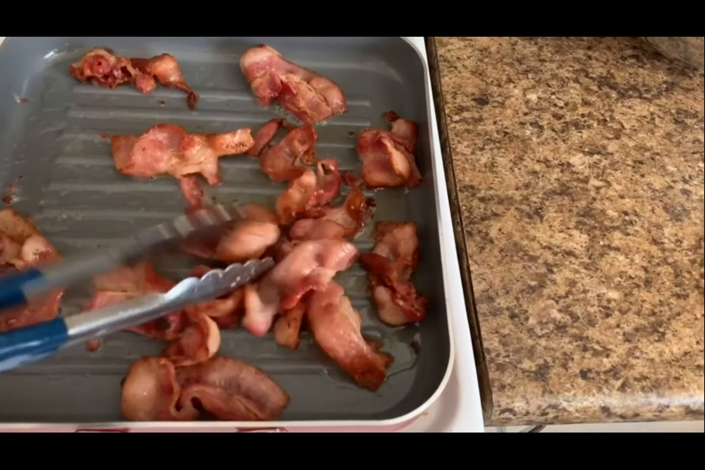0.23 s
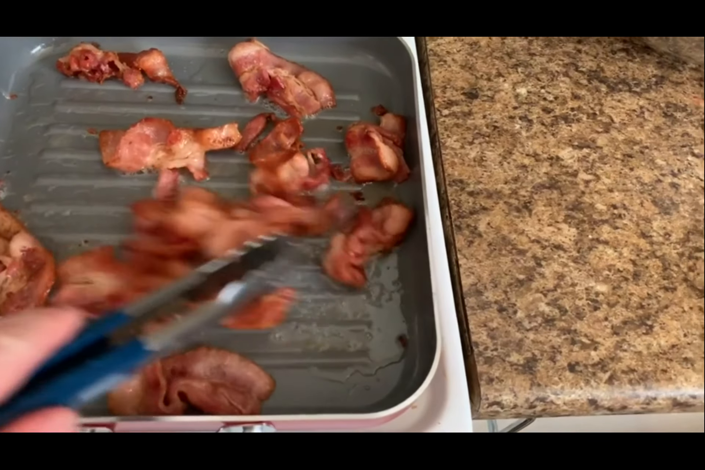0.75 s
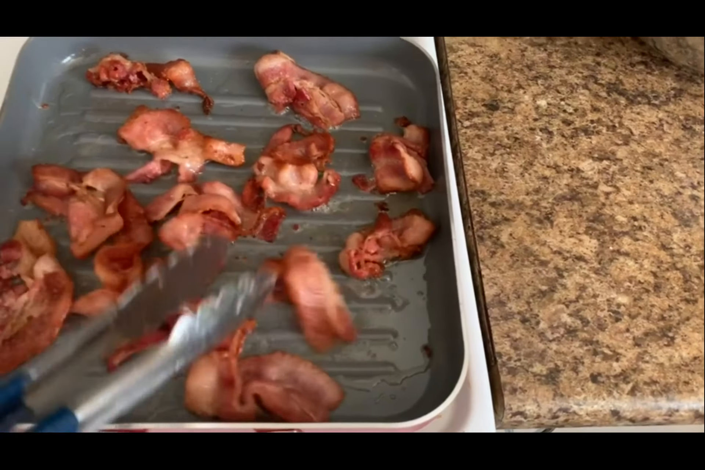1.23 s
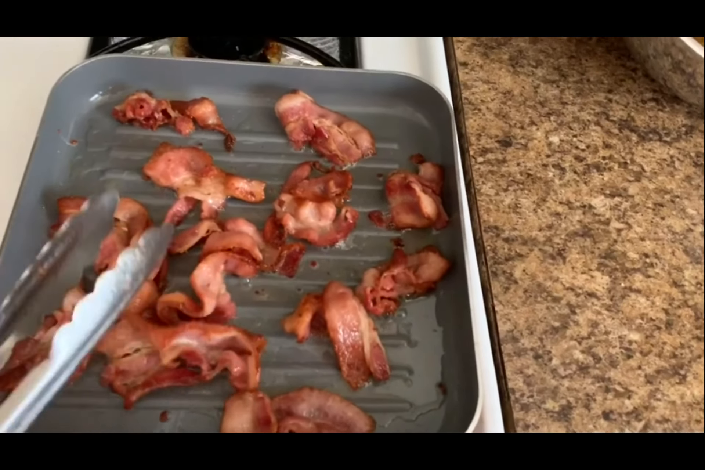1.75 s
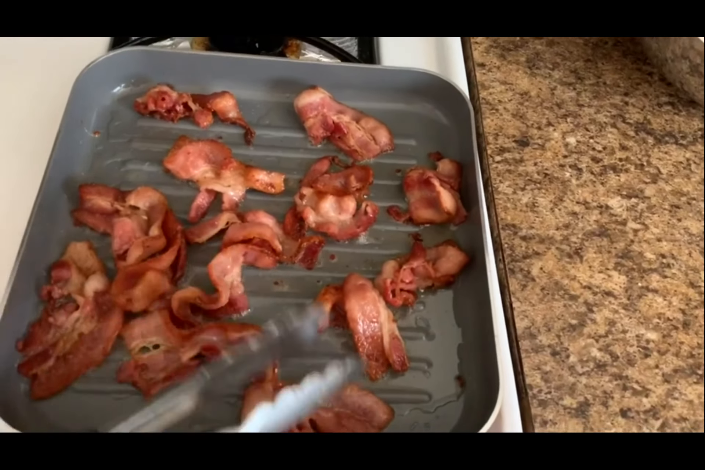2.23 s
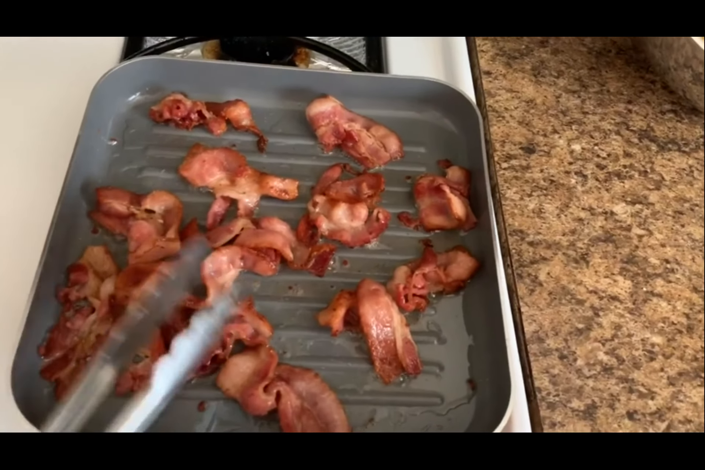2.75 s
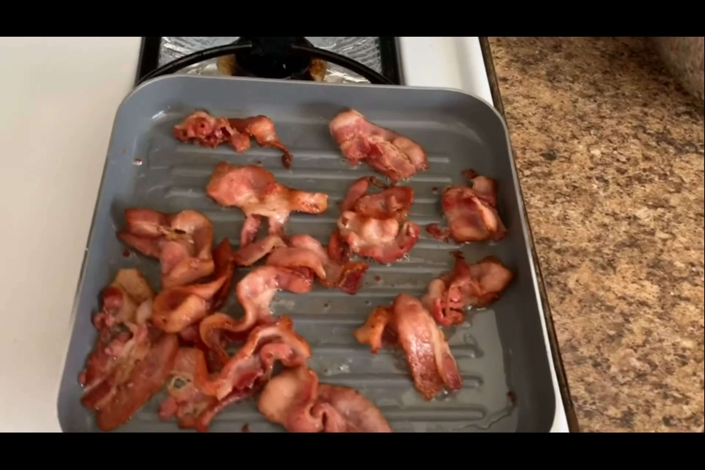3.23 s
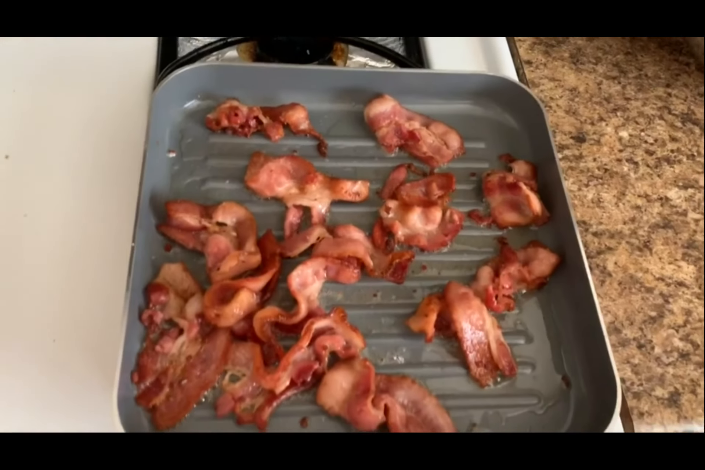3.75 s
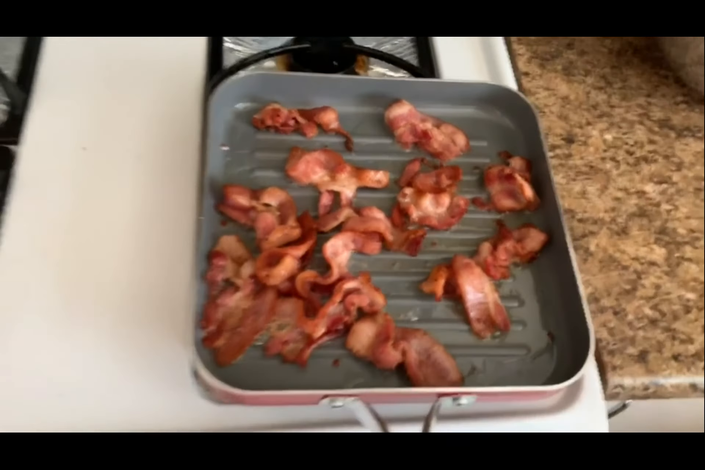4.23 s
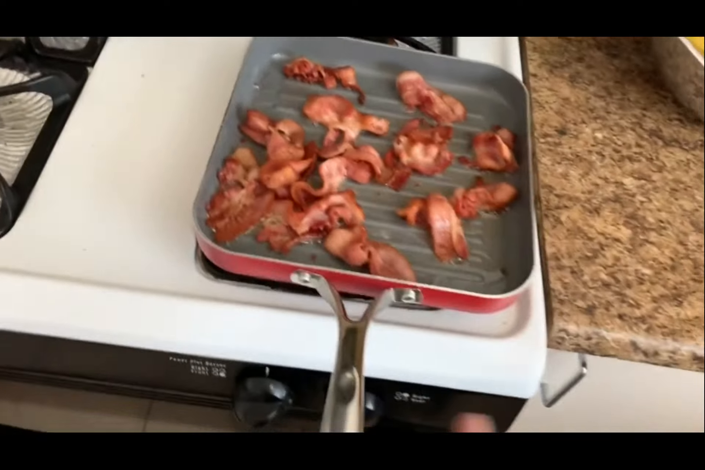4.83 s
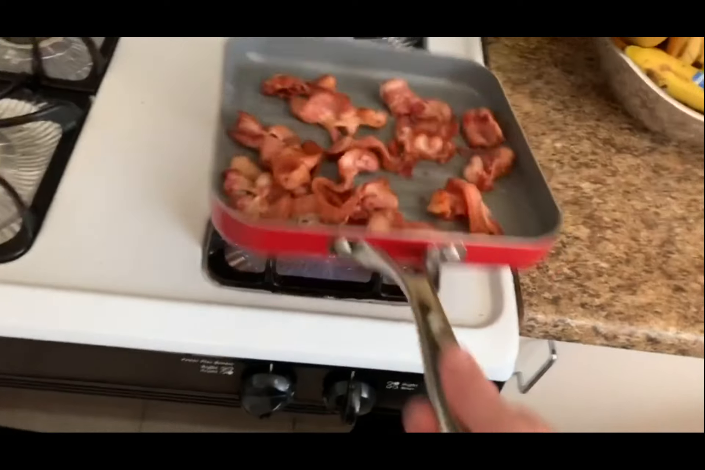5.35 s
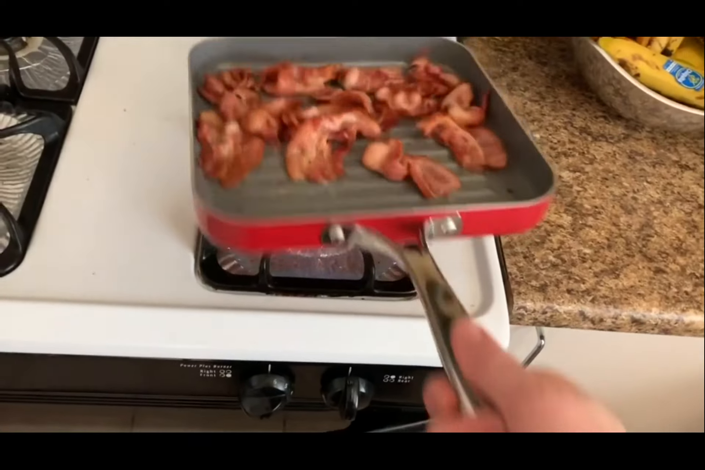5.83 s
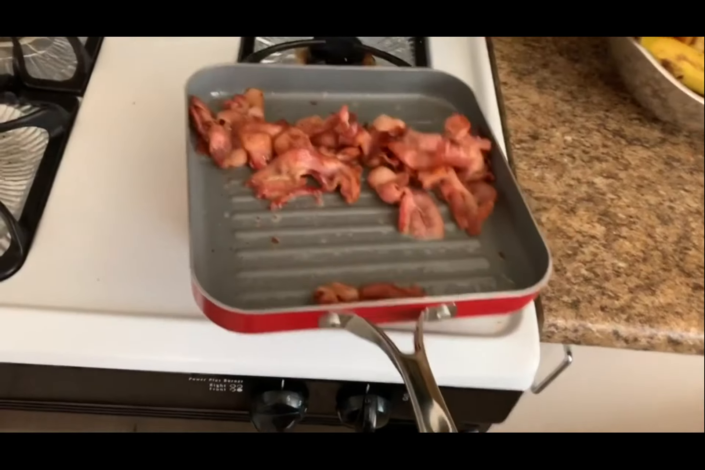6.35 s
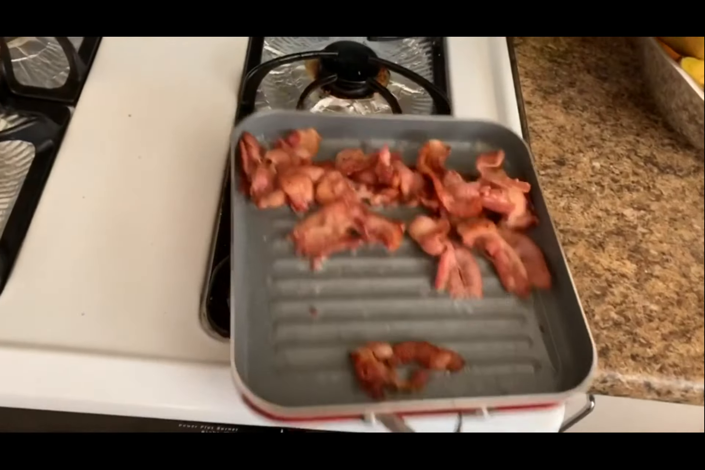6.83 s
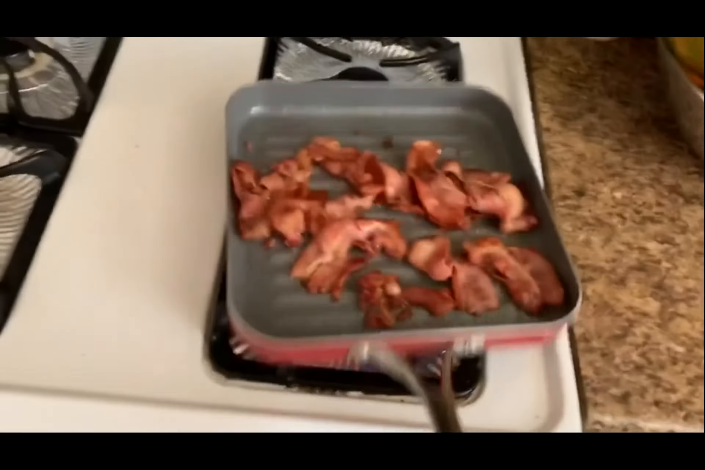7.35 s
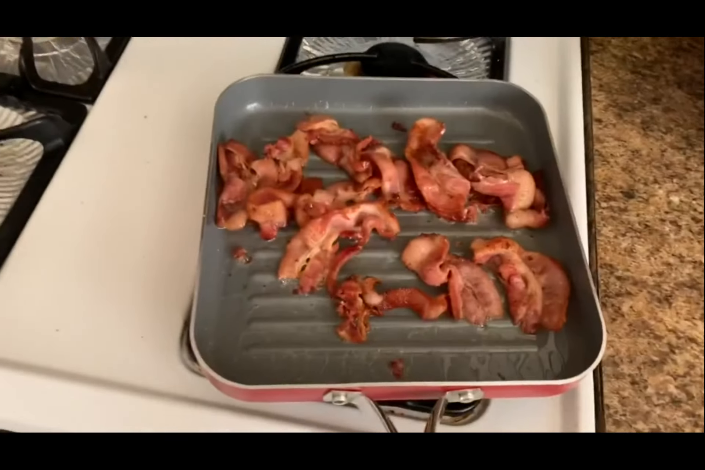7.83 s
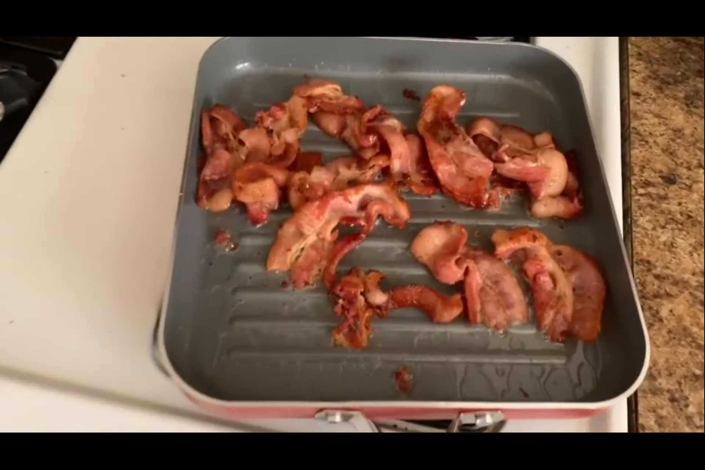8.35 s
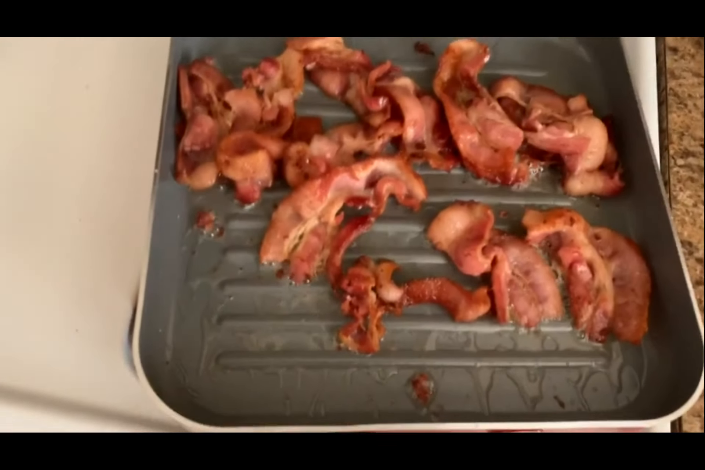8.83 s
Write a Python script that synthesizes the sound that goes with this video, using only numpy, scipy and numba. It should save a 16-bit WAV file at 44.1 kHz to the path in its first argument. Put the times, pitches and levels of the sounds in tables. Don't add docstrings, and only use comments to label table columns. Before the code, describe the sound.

Faint frying hiss and fat spits in a small kitchen, with sparse metallic tong knocks, dull knob clicks, soft bacon slaps and a loud rattling pan.

```python
import sys
import numpy as np
from scipy import signal
from scipy.fft import rfft, irfft, next_fast_len
from scipy.io import wavfile
from scipy.ndimage import uniform_filter1d
from numba import njit

SR = 44100
rng = np.random.default_rng(int(sys.argv[2]) if len(sys.argv) > 2 else 0)


def unload_audio(sound):
    columns = np.transpose(np.atleast_2d(sound))
    steps = np.round(np.clip(columns, -1, 1) * 32767)
    wavfile.write(sys.argv[1], SR, steps.astype(np.int16))


def invert_db(x):
    u = np.asarray(x, float) / 20
    return 10 ** u


N = 401310

# [t/s, peak level/dB, favoured f/Hz at the struck spot, thud level/dB, clank level/dB]
TONG_KNOCKS = [(0.002, -21.5, 1110, -5.5, -11.5), (0.76, -19, 1050, -27, -3), (0.775, -12, 1130, -35, -8.5),
               (0.830, -19.5, 1194, -39, -8), (1.935, -4.5, 766, 1, -11), (2.081, -4.5, 775, -6, -7.5),
               (2.124, -9.5, 836, -31, -13), (2.36, -6.5, 2040, -27, -9), (2.384, -17.5, 760, -2, 0),
               (2.45, -11.5, 673, -35, -8), (2.91, -8.5, 770, -12, -12), (2.941, -16.5, 744, -20, -10),
               (3.022, -15.5, 774, -2.5, -18), (3.546, -21, 2000, 7, -1.5), (3.609, -21, 2550, -21, -4.5),
               (3.635, -23, 1870, -9, -2.5), (3.684, -26.5, 670, 2, -17), (3.794, -29.5, 696, -26, -28)]
# [t/s, peak level/dB, favoured f/Hz at the struck spot, thud level/dB, clank level/dB]
GRATE_BUMPS = [(4.956, -21, 583, 0, -12), (4.983, -20.5, 1320, -16, -40), (5.051, -9, 795, -14, -3),
               (5.073, -22, 1120, -9, -3), (5.096, -33, 1330, -6, -3), (5.24, -17, 1350, 3, -14),
               (6.721, -7, 720, -0.5, -6), (6.767, -13, 950, -0.5, -9.5), (6.8805, -8, 640, -4, -3),
               (6.897, -11, 795, -31, -12), (6.992, -10.5, 1310, -25, -4.5), (7.0017, -10.5, 610, 0, -15),
               (7.026, -20, 1080, 2, -4.5), (7.052, -16, 1800, 0.5, -13), (7.092, -17, 820, -33, -9),
               (7.123, -11.5, 434, 0, -5.5), (7.1423, -4.5, 614, -10, -8), (7.172, -17.5, 640, -12, -8),
               (7.21, -17, 740, -10, -22), (7.268, -18.5, 710, -14, -2.5), (7.284, -21.5, 810, -7, 1),
               (7.298, -7.5, 780, -15.5, -9), (7.318, -8, 900, -7.5, -12.5), (7.332, -17.5, 990, 0, -20),
               (7.347, -25, 800, -3, -19), (7.442, -12, 870, -6.5, -17), (7.461, -8.5, 580, -23, -4),
               (7.486, -13, 615, 1, -10), (7.536, -10.5, 620, -24, -3), (7.556, -12.5, 1270, -6, -10),
               (7.658, -12, 890, -3.5, -16)]
# [t/s, pressure level/dB, hold/s, thud level/dB, clank level/dB]
TONG_SCRAPES = [(0.753, -29.5, 0.053, -8.5, -7.5), (0.84, -51, 0.0088, 5, 10.5),
                (1.925, -40, 0.0044, -2.5, -3), (1.938, -24, 0.011, -3.5, -3.5),
                (2.082, -18, 0.054, -2.5, -5), (2.2, -52.5, 0.094, 10.5, -4), (2.36, -29, 0.029, 4.5, 0.5),
                (2.45, -36, 0.0024, -7, 6), (2.897, -33, 0.0074, -0.5, -4), (2.912, -21.5, 0.051, 0.5, -3),
                (2.98, -44.5, 0.083, 3, -3), (3.552, -34, 0.11, 4, -4.5), (3.1, -62, 0.28, 12, -19),
                (3.72, -46.5, 0.084, 8.5, -18)]
# [t/s, pressure level/dB, hold/s, thud level/dB, clank level/dB]
GRATE_SLIDES = [(4.943, -42.5, 0.057, 9, -26), (5.055, -20.5, 0.054, -3, -7), (5.241, -28, 0.0052, 4, -9),
                (5.378, -59.5, 0.22, 9.5, -9), (6.722, -28, 0.026, -5, -4.5),
                (6.875, -26.5, 0.049, 3.5, -3), (6.995, -18, 0.068, -1, -7), (7.094, -19, 0.125, -7.5, -11),
                (7.272, -19, 0.079, -0.5, -7.5), (7.444, -21.5, 0.053, 0.5, -4.5),
                (7.539, -18.5, 0.021, -5.5, -8), (7.67, -27.5, 0.015, -1, -6),
                (7.792, -57.5, 0.14, 11, -14)]
# [f/Hz, level/dB, T60/s]
RESTING_MODES = [(94, -6, .25), (131, -5, .22), (214, -5, .2), (275, -9, .2), (321, -4, .2), (397, -5, .2),
                 (446, -7, .2), (560, -8, .13), (620, -3, .15), (690, -15, .12), (773, -3, .11),
                 (910, -8, .13), (1037, -6, .14), (1135, -4, .13), (1324, -3, .14), (1470, -9, .12),
                 (1729, -8, .12), (2025, -4, .11), (2165, -5, .11), (2286, -3, .13), (2550, -4, .13),
                 (2870, -6, .1), (3270, -7, .1), (3590, -8, .1), (4090, -9, .1), (4900, -11, .08),
                 (5500, -12, .08), (6850, -13, .06), (7200, -14, .06)]
# [f/Hz, level/dB per Hz]
CLATTER_SPECTRUM = [(24, -16.5), (40, -8), (81, -1.5), (279, -4.5), (358, -8), (401, -7), (491, -18),
                    (612, 0.5), (690, -4.5), (773, 1.5), (924, -6.5), (2080, -11.5), (7390, -23),
                    (8850, -35), (11500, -64.5), (19500, -120)]
# [t/s, level/dB, f/Hz, hold/s]
DRAG_SONGS = [(0.763, -23, 3610, 0.024), (0.766, -27, 2524, 0.023), (0.768, -20.5, 1113, 0.024),
              (0.764, -23, 808, 0.033), (0.77, -31, 1475, 0.058), (2.025, -37, 1035, 0.035),
              (2.202, -33, 1039, 0.024), (0.829, -16, 1140, 0.0069), (0.83, -24, 810, 0.012),
              (0.84, -26.5, 2150, 0.018), (1.939, -12.5, 785.5, 0.048), (1.944, -21.5, 2552, 0.019),
              (1.959, -27, 2089, 0.035), (1.937, -26.5, 3240, 0.027), (2.087, -14.5, 775, 0.067),
              (2.084, -19.5, 2037, 0.062), (2.086, -28, 2589, 0.029), (2.112, -18.5, 283, 0.027),
              (3.02, -19, 676, 0.0099), (3.675, -23.5, 176, 0.026), (5.056, -17, 786, 0.026),
              (5.075, -17.5, 421.5, 0.041), (5.083, -17.5, 1336, 0.032), (5.242, -34, 1320, 0.035),
              (5.255, -36, 935, 0.049), (5.246, -39, 1900, 0.031), (6.899, -19, 776, 0.032),
              (6.997, -20.5, 608, 0.016), (7.024, -22, 3050, .02), (7.038, -21, 270, 0.024),
              (7.054, -24, 1850, 0.017), (7.155, -26, 616, 0.026), (7.21, -25.5, 1317, 0.047),
              (7.32, -20.5, 2244, 0.024), (7.317, -22, 1000, 0.032), (7.464, -17.5, 616.4, 0.03),
              (7.553, -23, 1270, 0.011), (7.559, -17, 642, 0.03), (7.676, -27, 2760, 0.014),
              (3.541, -27, 2200, .012), (3.549, -27, 640, 0.016), (3.607, -30.5, 1550, 0.036),
              (3.606, -35, 1330, .015), (3.628, -32.5, 1000, .03), (7.407, -37, 3600, 0.038),
              (7.45, -21, 2750, .015), (7.476, -24, 2900, 0.012), (2.453, -21, 680, 0.014),
              (6.73, -21, 780, 0.024), (3.64, -25.5, 1994, 0.019), (3.64, -28, 2500, 0.019),
              (3.795, -43, 2190, 0.0067), (3.025, -16.5, 740, .012)]
# [t/s, level/dB, f/Hz, hold/s]
DIRECT_SONGS = [(0.751, -30, 945, .008), (7.094, -13.5, 795, .012), (7.04, -17.5, 190, 0.025),
                (7.123, -21.5, 1300, .015), (7.211, -19, 700, 0.023), (7.27, -20.5, 663, .02),
                (7.312, -17, 791, .03), (7.28, -26.5, 2166, 0.076), (7.444, -15, 866, .01),
                (7.6, -26, 700, 0.038), (7.684, -16, 777, .008)]
# [t/s, peak level/dB, f/Hz]
BOTTOM_THUNKS = [
    (2.081, -14, 784),
    (2.383, -4.5, 787),
    (2.910, -0.5, 757),
    (2.942, -7.5, 772),
    (3.023, -5, 793),
    (5.244, -37, 1290),
    (7.66, -12.5, 766),
    (7.68, -7.5, 757),
    (1.949, -13, 750),
]
# [t/s, peak level/dB, f/Hz]
EDGE_CRACKS = [(2.361, -13, 2180), (5.15, -25, 4000), (5.24, -26, 2500), (5.053, -15, 3500),
               (6.721, -13.5, 3000), (6.724, -22, 1486), (6.881, -11, 2480), (6.992, -15, 2500),
               (7.0, -6, 1700), (7.032, -19, 3000), (7.096, -18, 1300), (7.146, -15, 2500),
               (7.175, -18.5, 1990), (7.215, -27, 900), (7.269, -16, 2500), (7.299, -14.5, 4000),
               (7.4436, -12, 3000), (7.461, -16, 3000), (7.5, -27, 1200), (7.537, -9, 2530),
               (7.561, -25, 1300), (7.675, -23, 2800)]
# [t/s, peak level/dB, f/Hz]
BROAD_SNAPS = [(0.831, -23, 3400), (7.36, -22, 400), (7.49, -12, 400), (7.053, -11, 200),
               (2.365, -14, 2100), (7.2695, -18, 1200), (7.094, -15, 2000), (7.0215, -15, 1500),
               (7.068, -18, 1200), (7.123, -19, 2000), (7.287, -19, 3500), (7.326, -18, 1500),
               (7.487, -15, 1500), (7.498, -16, 900), (7.658, -25, 2600), (8.042, -40, 2500),
               (8.913, -36, 2600), (8.925, -41, 4500)]
# [t/s, peak level/dB, f/Hz]
TONG_CLINKS = [(0.775, -16.5, 2570), (0.83, -36, 2180), (2.0803, -10.5, 1960), (2.362, -13, 2110),
               (2.9098, -13.5, 2090), (3.5496, -14, 1954), (3.6087, -23, 2470), (3.6367, -16, 1960),
               (3.7938, -31, 2180), (4.9564, -30, 2140), (5.0539, -14, 2020), (7.0005, -16, 2260),
               (7.5373, -15, 2160)]
# [t/s, peak level/dB, f/Hz]
RIM_TINKS = [(0.7731, -3, 3590), (0.8315, -19, 3240), (2.3625, -10, 3200), (2.4493, -15, 3700),
             (3.0245, -17.5, 3254), (3.5468, -15, 4960), (3.6374, -24, 3610), (4.9571, -29, 4150),
             (5.0524, -30, 3500), (6.7211, -22, 3630), (7.0928, -33, 3380), (7.2988, -21, 4720),
             (7.4435, -21, 7520)]
# [t/s, peak level/dB, favoured f/Hz, slide length/s]
BACON_TOSSES = [
    (5.23, -38, 1320, 0.0051),
    (5.29, -43, 935, 0.012),
    (5.408, -39.5, 1300, 0.016),
    (5.768, -36, 1030, 0.034),
    (5.991, -40, 1720, 0.03),
    (6.17, -34, 1340, 0.035),
    (6.253, -23.5, 1265, 0.007),
]
# [f/Hz, level/dB, T60/s]
LIFTED_MODES = [(935, -3, 0.2), (1050, 5, 0.59), (1265, 3, 0.2), (1720, -6, 0.29), (1870, 0, 0.12),
                (2290, 2, 0.21), (2500, 3, 0.048), (3150, -2, .07)]
# [t/s, peak level/dB, f/Hz, T60/s]
FREE_RINGS = [(5.243, -34, 935, .3), (5.243, -28, 1326, .25), (5.776, -45, 1034, 0.46),
              (5.776, -50, 1330, .25), (5.772, -45, 2060, .14), (5.776, -54, 2530, .35),
              (5.99, -48, 921, .25), (5.99, -51, 1330, .2), (6.006, -52, 1707, .7), (6.182, -39, 1320, .2),
              (6.255, -39, 3150, .12)]
# [t/s, peak level/dB, f/Hz, T60/s]
KNOB_TICKS = [
    (4.252, -11.5, 890, 0.011),
    (4.379, -19.5, 615, 0.042),
    (4.482, -16, 301, 0.02),
    (4.53, -12.5, 545, 0.026),
    (4.541, -22, 770, 0.013),
    (4.546, 4.5, 490, 0.02),
    (4.553, -5, 764, 0.028),
    (4.576, -17, 770, 0.022),
]
# [t/s, peak level/dB, f/Hz]
FAT_SPITS = [(0.3284, -45, 2540), (1.256, -39, 5300), (1.405, -35.5, 6900), (1.483, -36, 3300),
             (1.548, -32, 3930), (1.7527, -19.5, 3720), (2.05, -31, 6760), (2.333, -29.5, 6900),
             (2.595, -42, 7000), (2.6509, -40, 3900), (2.7555, -36.5, 3370), (2.79, -25.5, 6800),
             (3.247, -33, 4500), (3.384, -31.5, 6560), (3.386, -35, 2280), (3.413, -27.5, 4180),
             (3.865, -43, 4120), (4.0233, -34, 5100), (4.379, -30, 2500), (4.5528, -31.5, 2410),
             (4.8755, -41.5, 6900), (5.5464, -30, 6800), (5.674, -34, 4630), (5.745, -34, 5370),
             (6.178, -49, 2570), (6.225, -27, 4600), (8.0426, -36, 6850), (8.7905, -30, 7450),
             (8.897, -34, 5420), (8.9153, -37, 7170)]
# [t/s, peak level/dB, f/Hz, T60/s]
FAT_FLARES = [
    (0.1521, -29, 3670, 0.068),
    (1.722, -39.5, 6800, 0.53),
    (1.7814, -28, 3730, 0.08),
    (4.2574, -24, 4400, 0.06),
    (5.4552, -42, 4500, 0.37),
    (5.6297, -41, 5200, 0.12),
    (6.1799, -37.5, 5530, 0.47),
    (6.2584, -25.5, 3150, 0.069),
    (8.8972, -43, 7540, 0.14),
]
# [t/s, level/dB]
SIZZLE_LEVEL = [(0.0, -53.5), (0.33, -55.5), (1.22, -55), (1.8, -54), (2.5, -55), (3.42, -54), (4.9, -56.5),
                (5.25, -55.5), (6.18, -55.5), (7.75, -56), (8.08, -55.5), (9.1, -52.5)]
# [f/Hz, level/dB per Hz]
SIZZLE_SPECTRUM = [(710, -28.5), (1200, -18.5), (1540, -14.5), (2440, -6.5), (2960, -4), (4890, -2),
                   (6130, -7), (7300, 3.5), (7940, -10), (8850, -9), (11500, -47.5), (19500, -120)]
# [f/Hz, level/dB per Hz]
AIR_SPECTRUM = [(15, -23), (32, -3.5), (58, 0.5), (125, -0.5), (160, -5.5), (190, -12.5), (250, -9),
                (330, -11.5), (480, -15), (900, -27), (1300, -24), (3000, -39), (5000, -49.5)]
# [f/Hz, width/Hz, level/dB]
FAN_TONE = (207, 10.2, -47.5)
# [t/s, level/dB]
FLAME_LEVEL = [
    (0, -57.5),
    (3.1, -55.5),
    (3.3, -61),
    (3.5, -57),
    (5.2, -60),
    (5.4, -73),
    (6.3, -60.5),
    (6.6, -62),
    (9.1, -54),
]
# [t/s, rumble level/dB, hold/s]
FINGER_SHIFTS = [
    (4.2, -51, .03),
    (4.4, -42.5, 0.034),
    (4.56, -42.5, 0.13),
    (5.336, -46, 0.054),
    (5.443, -40, 0.023),
    (7.794, -46, 0.054),
    (7.852, -45, 0.023),
]

THUD_FOOT_HZ, THUD_TOP_HZ, CLANK_FOOT_HZ = 74, 413, 1644
CHATTER_S = 0.012
CLINK_T60_S, TINK_T60_S, THUNK_T60_S = 0.1, 0.063, 0.085
SPIT_T60_S, CRACK_T60_S = 0.025, 0.014
PRESS_DB_S, EASE_DB_S = 2601.5, 291.5
LINGER, LINGER_TOP_DB, DULLING, SKIM = 0.42, 23, 0.084, 0.46
SONG_RISE_S, SONG_CHOKE_DB_S, SONG_ROUGH = 0.0018, 899.5, 0.4
SLOSH_DB = -27.5
FLAME_HZ, AIR_DB = 755, -47.5
GRIP_RISE_DB_S, GRIP_FALL_DB_S = 505, 145
ROOM_T60_S, ROOM_DB, ROOM_DULL_HZ = 0.35, -9, 3000
NOTES_WET_DB = -11
CEILING, TOP_HZ, CLIP = 0.74, 8313, 0.7


def pan():
    s, db, spot_hz, thud_db, clank_db = np.transpose(TONG_KNOCKS + GRATE_BUMPS)
    chatter = grit(7000, 2.0)
    slip = grit(5000, 1.5) * invert_db(3 * walk(60))
    bounce_s = np.full(len(s), CHATTER_S)
    force = np.array([strikes(s, db + part_db - 9.0, bounce_s, chatter) for part_db in (thud_db, 0, clank_db)])
    force[0] = sieve(force[0], 170, "high")
    force += invert_db(-3.5) * slip * drags(TONG_SCRAPES + GRATE_SLIDES)
    force[0] = np.roll(force[0], int(0.007903 * SR))

    group = np.searchsorted([THUD_TOP_HZ, CLANK_FOOT_HZ], np.array(RESTING_MODES)[:, 0])
    part_gain = invert_db(np.array([[3.0], [-3.0], [1.5]]))
    modes = body(force * part_gain, RESTING_MODES, group, s, spot_hz, 9.3, 0.62, damping=2.18, detune=0.0064)

    thud = sieve(force[0], [THUD_FOOT_HZ, THUD_TOP_HZ], "band")
    mid = band(force[1], 1270, 1490)
    clank = sieve(force[2], CLANK_FOOT_HZ, "high")
    clatter = colour(invert_db(3.0) * thud + mid + invert_db(6.0) * clank, CLATTER_SPECTRUM)
    return modes + invert_db(18.5) * clatter


def strikes(times, db, lengths, chatter, first=1.0):
    out = np.zeros(N)
    for s, d, length in zip(times, db, np.clip(lengths, .001, .1)):
        i = int(s * SR)
        t = np.arange(min(int(6 * length * SR), N - i)) / SR
        onset = 1 - np.exp(-t / 0.00065)
        bounces = np.exp(-t / length)
        touch = first * np.exp(-t / 0.0037)
        out[i:i + len(t)] += invert_db(d) * onset * (bounces + touch)
    return out * chatter


def drags(rows):
    out = np.zeros((3, N))
    for s, db, hold_s, thud_db, clank_db in rows:
        before, after = slack(s, hold_s, PRESS_DB_S, EASE_DB_S)
        near = before + after < 70
        before, after = before[near], after[near]
        thud = thud_db + np.minimum(LINGER * after, LINGER_TOP_DB)
        clank = clank_db + SKIM * before - DULLING * after
        tilt = np.array([thud, 0 * after, clank])
        out[:, near] += invert_db(db - before - after + tilt)
    return out


def body(force, modes, group, times, spot_hz, spot_db, scatter_db, damping, detune):
    hz, db, t60 = np.transpose(modes)
    chance = rng.standard_normal((len(times), 3, len(hz)))
    turn = 2j * np.pi * hz * (1 + detune * chance[:, 2]) / SR
    poles = np.exp(turn - damping * np.log(1000) / (t60 * SR))
    near = np.exp(-(np.log(hz / spot_hz[:, None]) / 0.093) ** 2)
    gain = invert_db(db + spot_db * near + scatter_db * chance[:, 0])
    touch = gain * np.sign(chance[:, 1]) * np.sqrt(1 - abs(poles))
    which = np.clip(np.searchsorted(times, np.arange(N) / SR + 0.0016) - 1, 0, None)
    return ring(force, poles, group, touch, which)


@njit
def ring(force, poles, group, touch, which):
    out, z = np.zeros(force.shape[1]), np.zeros(len(group), np.complex128)
    for i in range(len(out)):
        for m in range(len(group)):
            push = touch[which[i], m] * force[group[m], i]
            z[m] = z[m] * poles[which[i], m] + push + 1e-18
            out[i] += z[m].imag
    return out


def songs(rows):
    out, t = np.zeros(N), np.arange(8000) / SR
    for s, db, hz, hold_s in rows:
        rough = band(rng.standard_normal(len(t)), hz, 70)
        pure = np.sin(2 * np.pi * hz * t)
        tone = (1 - SONG_ROUGH) * pure + SONG_ROUGH * rough / rough.std()
        choke_db = SONG_CHOKE_DB_S * np.clip(t - hold_s, 0, 1)
        i = int(s * SR)
        out[i:i + len(t)] += tone * (1 - np.exp(-t / SONG_RISE_S)) * invert_db(db - choke_db)
    return out


def ticks(events, sharpness, noisy, rise_s):
    out, t = np.zeros(N + 8000), np.arange(8000) / SR
    ending = np.clip((t[-1] - t) / .05, 0, 1)
    for s, db, hz, t60 in events:
        decay = np.exp(-np.log(1000) * t / max(t60, .004))
        fall = (1 - np.exp(-t / rise_s)) * decay * ending
        width = hz / sharpness
        hiss = band(band(rng.standard_normal(len(t)), hz, width), hz, width)
        tone = np.sin(2 * np.pi * hz * t) * (1 - noisy) + noisy * hiss / hiss.std()
        i = int(s * SR)
        out[i:i + len(t)] += invert_db(db) * fall * tone
    return out[:N]


def metal_notes():
    thunks = ticks(lasting(BOTTOM_THUNKS, THUNK_T60_S), 4.1, 0.39, 0.00066)
    steel = lasting(TONG_CLINKS, CLINK_T60_S) + lasting(RIM_TINKS, TINK_T60_S)
    return thunks + songs(DRAG_SONGS) + invert_db(-3.5) * ticks(steel, 37, 0.39, 0.0005)


def edge_cracks():
    return ticks(lasting(EDGE_CRACKS, CRACK_T60_S), 1.0, 0.93, 0.00029)


def lifted_pan():
    s, db, spot_hz, length = np.transpose(BACON_TOSSES)
    force = strikes(s, db, length, grit(9700, 0.96), first=.1)
    group = np.zeros(len(LIFTED_MODES), np.int64)
    modes = body(force[None], LIFTED_MODES, group, s, spot_hz, 9.4, 1.27, damping=1.0, detune=0.0027)
    slap = band(band(force, 2200, 5500), 2200, 5500)
    return invert_db(-16.5) * modes + invert_db(-3.0) * slap


def close_sounds():
    rings = ticks(FREE_RINGS, 45, 0.3, .004)
    snaps = ticks(lasting(BROAD_SNAPS, CRACK_T60_S), .9, 0.81, .0003)
    return rings + songs(DIRECT_SONGS) + snaps


def stove_knob():
    return invert_db(-6.0) * ticks(KNOB_TICKS, 2.56, 0.66, 0.0001)


def spitting_fat():
    spits = ticks(lasting(FAT_SPITS, SPIT_T60_S), 2.8, 0.46, 0.00075)
    return invert_db(-1.5) * spits + invert_db(-6) * ticks(FAT_FLARES, 1.5, 1, .008)


def sizzle():
    fine = np.zeros(N)
    for hz in 1300 * 1.24 ** np.arange(10):
        flicker = invert_db(3.6 * walk(17) + .7 * walk(3))
        fine += band(rng.standard_normal(N), hz, hz / 4) * flicker / np.sqrt(hz)
    crackle = grit(1400, 2.0) * invert_db(6.5 * walk(9.1))
    hiss = level(colour(level(fine, 0) + invert_db(-8.0) * crackle, SIZZLE_SPECTRUM), 0)
    stirring = invert_db(SLOSH_DB) * drags(GRATE_SLIDES)[1]
    return hiss * (invert_db(0.14) * curve(SIZZLE_LEVEL, fade_s=0.00026) + stirring)


def kitchen():
    air = level(colour(rng.standard_normal(N), AIR_SPECTRUM) * invert_db(2.0 * walk(3.9)), AIR_DB)
    fan_hz, width_hz, fan_db = FAN_TONE
    whirr = level(band(rng.standard_normal(N), fan_hz, width_hz), 0)
    hum = 0.83 * np.sin(2 * np.pi * fan_hz * np.arange(N) / SR)
    gap = level(band(band(rng.standard_normal(N), FLAME_HZ, 230), FLAME_HZ, 230), 0)
    flame = gap * invert_db(2.5 * walk(9)) * curve(FLAME_LEVEL, fade_s=.001)
    return air + level(whirr + hum, fan_db) + flame


def hand():
    rumble = level(band(band(rng.standard_normal(N), 55, 55), 55, 55), 0)
    grip = np.zeros(N)
    for s, db, hold_s in FINGER_SHIFTS:
        before, after = slack(s, hold_s, GRIP_RISE_DB_S, GRIP_FALL_DB_S)
        grip += invert_db(db - before - after)
    return rumble * grip


def room(x):
    t = np.arange(SR // 2) / SR
    noise = rng.standard_normal(len(t)) * (t > .004)
    low = signal.lfilter(*signal.butter(1, ROOM_DULL_HZ, fs=SR), noise)
    fall = np.log(1000) * t / ROOM_T60_S
    tail = low * np.exp(-fall) + (noise - low) * np.exp(-1.6 * fall)
    tail /= np.sqrt(np.sum(tail ** 2))
    return x + invert_db(ROOM_DB) * signal.fftconvolve(x, tail)[:N]


def lasting(rows, t60_s):
    return [(*row, t60_s) for row in rows]


def slack(s, hold_s, rise_db_s, fall_db_s):
    t = np.arange(N) / SR
    return rise_db_s * np.clip(s - t, 0, 1), fall_db_s * np.clip(t - s - hold_s, 0, 1)


def curve(table, fade_s):
    s, level_db = np.transpose(table)
    t = np.arange(N) / SR
    gain = invert_db(np.interp(t, s, level_db, left=-150, right=-150))
    return gain * np.clip((t - s[0]) / fade_s, 0, 1) ** 2


def level(x, db):
    return x * invert_db(db) / np.sqrt(np.mean(x ** 2))


def colour(x, points):
    hz, db = np.transpose(points)
    size = next_fast_len(N)
    f = np.arange(size // 2 + 1) * SR / size + 1
    gain = invert_db(np.interp(np.log(f), np.log(hz), db))
    return irfft(rfft(x, size) * gain, size)[:N]


def band(x, hz, width):
    return signal.lfilter(*signal.iirpeak(min(hz, .4 * SR), hz / width, fs=SR), x)


def sieve(x, hz, kind):
    return signal.sosfilt(signal.butter(2, hz, kind, fs=SR, output="sos"), x)


def walk(rate):
    k = int(SR / rate)
    steps = np.repeat(rng.standard_normal(N // k + 1), k)
    return uniform_filter1d(uniform_filter1d(steps, k), k)[:N]


def grit(rate, spread_db):
    hit = rng.random(N) < rate / SR
    size = rng.standard_normal(N) * invert_db(spread_db * rng.exponential(size=N))
    return level(hit * size, 0)


def scene():
    notes = metal_notes()
    metal = pan() + lifted_pan() + edge_cracks()
    wet = room(metal + spitting_fat() + invert_db(NOTES_WET_DB) * notes)
    dry_notes = (1 - invert_db(NOTES_WET_DB)) * notes
    background = sizzle() + kitchen() + hand()
    return (wet + dry_notes + close_sounds() + stove_knob() + background)[None]


def top_cut(x):
    return signal.sosfilt(signal.butter(12, 15800, fs=SR, output="sos"), x)


def record(dry):
    squeezed = dry / (1 + abs(dry / CEILING) ** 6) ** (1 / 6)
    rolled_off = signal.sosfilt(signal.cheby1(10, .5, TOP_HZ, fs=SR, output="sos"), squeezed)
    mix = np.clip(rolled_off, -CLIP, CLIP)
    return top_cut(mix)


dry = scene()
out = record(dry)
unload_audio(out)
```